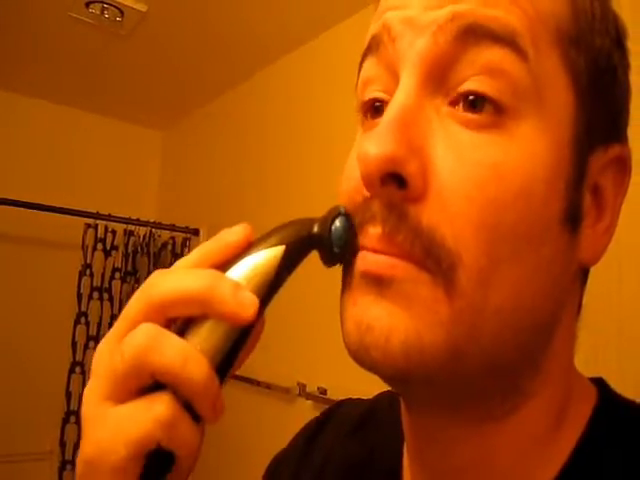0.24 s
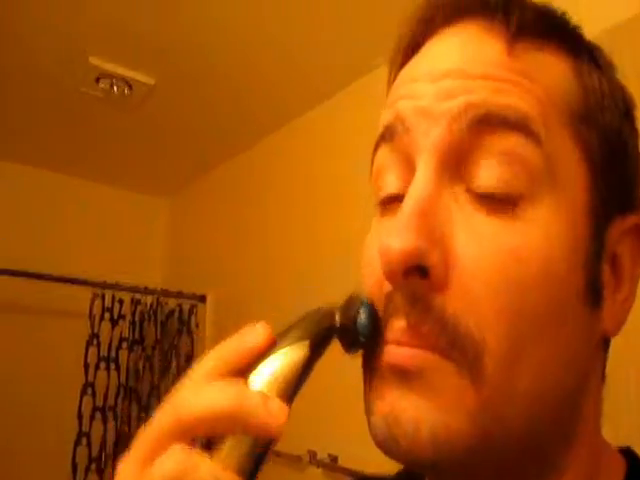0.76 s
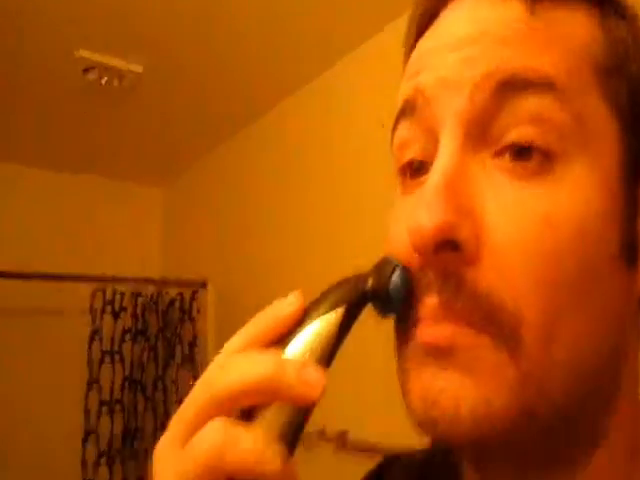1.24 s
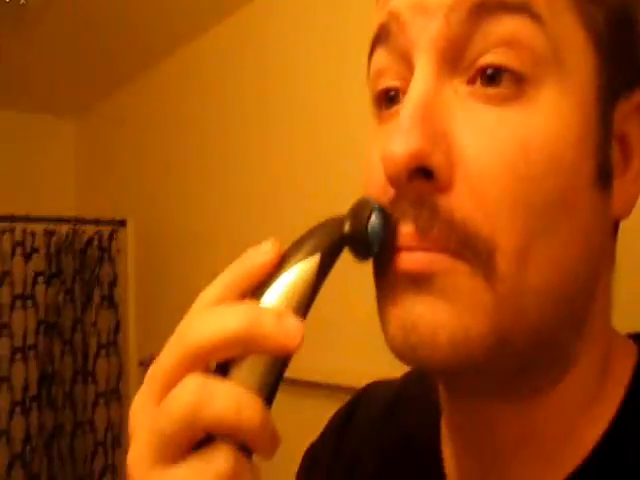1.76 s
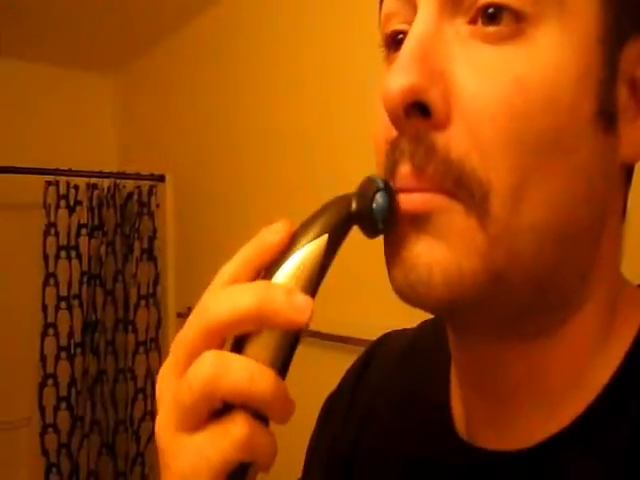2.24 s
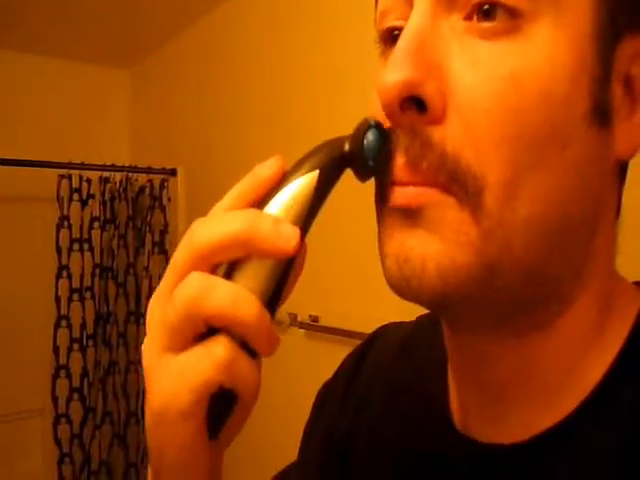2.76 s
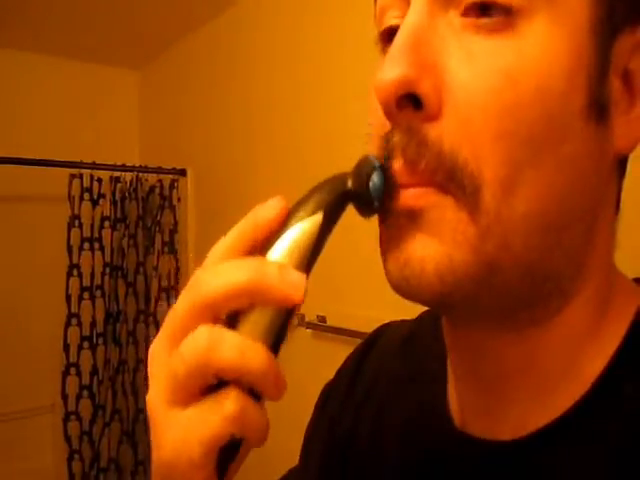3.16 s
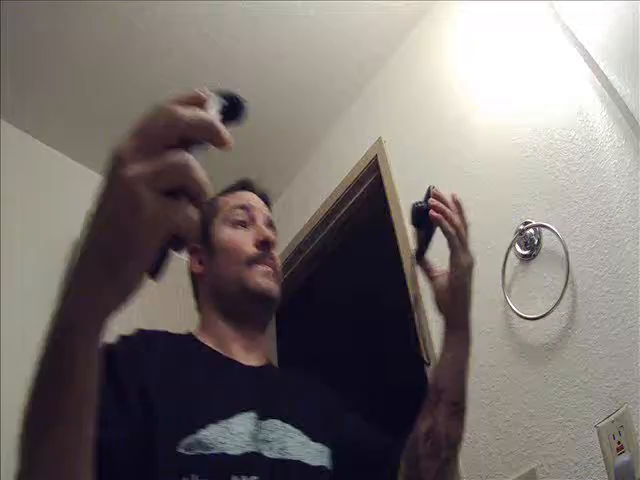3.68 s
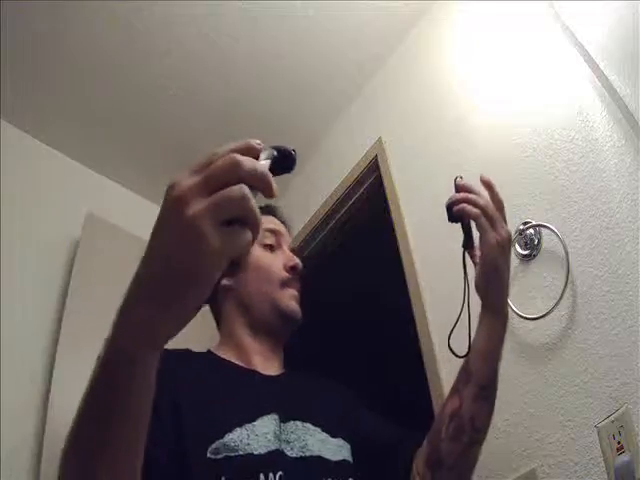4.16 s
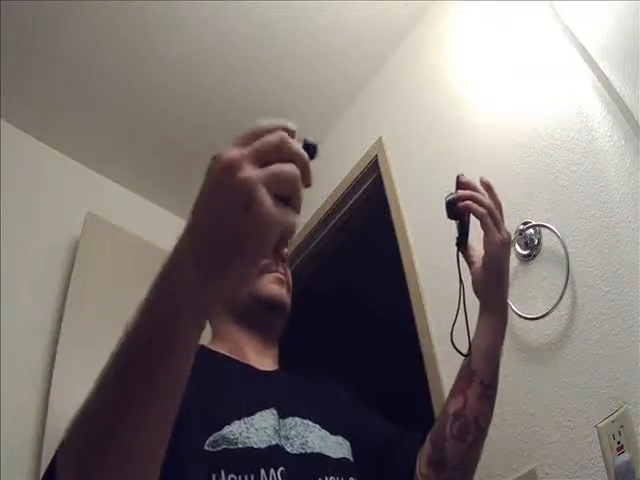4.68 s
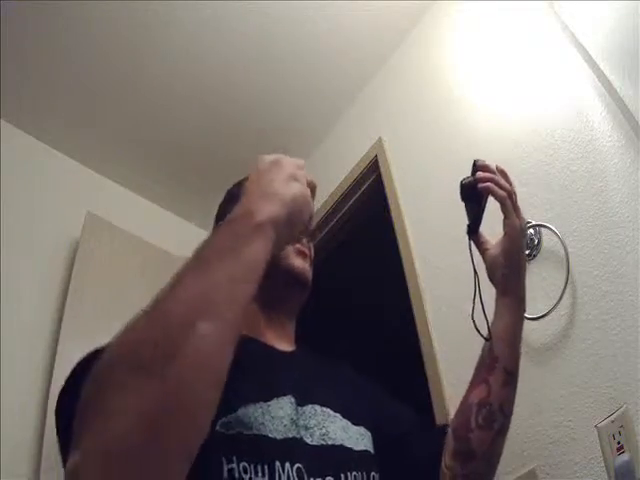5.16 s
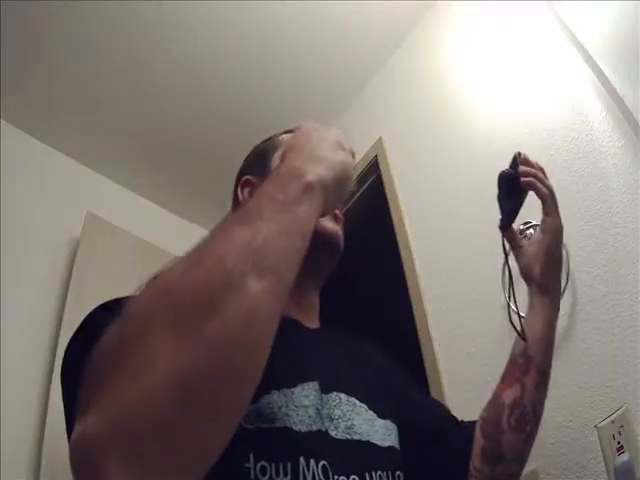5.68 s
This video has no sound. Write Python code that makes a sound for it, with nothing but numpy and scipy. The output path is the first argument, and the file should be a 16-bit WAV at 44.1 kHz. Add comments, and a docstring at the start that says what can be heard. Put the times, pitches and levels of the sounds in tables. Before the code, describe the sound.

Close, crackling electric shaver grinds over facial hair in a small room; near four seconds it suddenly drops to a faint, free-running buzz.

```python
"""A shaver whines and clatters close by while stubble snips and snags against its ringing head.
Room rumble and a droning extractor fan lie underneath. Near four seconds the close sound cuts to a far quieter,
duller microphone that hears the motor running free, with hiss, a low hum and two soft rustles.
Motor tones and rattle follow a slightly trembling shaft angle; noise clicks excite resonances for the hairs;
filtered noise makes the air sounds."""
import sys
import numpy as np
from scipy import signal
from scipy.fft import rfft, irfft
from scipy.io import wavfile
from scipy.ndimage import uniform_filter1d, map_coordinates

SR = 44100
rng = np.random.default_rng(int(sys.argv[2]) if len(sys.argv) > 2 else 0)


def waveform_to_disk(signal):
    """Save audio, clipped to [-1, 1], as 16-bit WAV at the path in sys.argv[1]."""
    frames = np.transpose(np.atleast_2d(signal))
    scaled = np.clip(frames, -1, 1) * 32767
    samples = np.round(scaled).astype(np.int16)
    wavfile.write(sys.argv[1], SR, samples)


N = 261072
T = np.arange(N) / SR  # time [s]

# Close levels stand ahead of the close fader; all levels stand ahead of the final rounding and top cut.
# Shaft speed up close, before its tremble: (time [s], shaft rate [Hz])
NEAR_SPEED = [(0.1, 105.8), (0.16, 111.2), (0.6, 110.8), (0.72, 107.3), (1.4, 107.2), (2.4, 106.3),
              (2.65, 105.2), (3.0, 106.2), (3.2, 105.6), (3.58, 106.6), (3.7, 104.9), (3.8, 106.0)]
# Motor whine: (multiple of shaft rate, relative level [dB])
NEAR_ORDERS = [(1, -13.5), (2, -20), (8, -3), (9, -4.5), (10, -7.5), (11, -4.5), (12, -3), (13, -6),
               (15, -1.5), (21, -5)]
NEAR_WHINE_DB, NEAR_CLATTER_DB = -44, -28.5
# Wandering motor drone: (time [s], pitch [Hz], rms level [dB])
DRONE = [(0.0, 729.9, -46.5), (0.17, 780.9, -38), (0.42, 764.4, -37.5), (0.49, 743.3, -44),
         (0.51, 786.3, -43), (0.61, 765.6, -37.5), (0.63, 751.9, -56), (0.67, 743.2, -39.5),
         (0.78, 741.1, -46), (0.9, 751.1, -38), (0.96, 746.0, -51), (0.99, 747.4, -42.5),
         (2.45, 745.6, -43.5), (2.59, 737.9, -36.5), (2.62, 738.7, -44.5), (2.88, 737.1, -37),
         (3.04, 774.7, -45), (3.15, 741.6, -45), (3.77, 742.7, -38.5), (3.8, 786.5, -45)]
# Two low motor hums: (time [s], third multiple rms level [dB], fifth multiple rms level [dB])
HUM = [(0.02, -52, -65), (0.12, -50.5, -59), (0.16, -58, -65), (0.3, -59.5, -47), (0.46, -71, -55),
       (0.59, -60, -50), (0.8, -56, -65.5), (0.92, -62, -41), (1.03, -57, -72), (1.13, -54, -65.5),
       (1.19, -50, -39), (1.35, -56, -61), (1.6, -56.5, -63.5), (1.78, -63, -77), (1.95, -63, -61.5),
       (2.2, -55, -53), (2.5, -60.5, -78), (2.56, -53, -44.5), (2.64, -57, -77), (2.71, -58.5, -45.5),
       (2.81, -46.5, -44.5), (2.9, -48.5, -56.5), (3.0, -53.5, -48), (3.15, -52, -77), (3.34, -58.5, -65),
       (3.61, -63.5, -69.5), (3.72, -49.5, -45), (3.789, -52.5, -57)]
HUM_ORDERS = 3, 5  # multiples of shaft rate
# Motor tones that swell briefly:
# (time [s], multiple of shaft rate, half length to 1/e [s], rms level at the crest [dB])
NEAR_SWELLS = [(0.13, 8, 0.09, -35.5), (0.22, 6, 0.085, -30.5), (0.22, 10, 0.036, -40),
               (0.22, 14, 0.1, -34.5), (0.33, 13, 0.05, -36), (0.36, 16, 0.09, -43), (0.39, 14, 0.06, -36),
               (0.41, 6, 0.035, -35.5), (0.53, 6, 0.013, -34), (0.57, 13, 0.054, -34.5),
               (0.59, 6, 0.014, -33), (0.92, 6, 0.09, -36), (0.94, 9, 0.07, -37.5), (1.21, 15, 0.05, -36),
               (1.22, 6, 0.05, -35), (1.38, 6, 0.052, -39.5), (2.0, 6, 0.05, -41), (2.54, 10, 0.045, -37),
               (2.68, 15, 0.08, -40.5), (2.72, 14, 0.06, -39), (2.81, 10, 0.025, -37),
               (2.95, 13, 0.07, -38.5), (3.24, 8, 0.035, -41), (3.5, 9, 0.12, -43), (3.52, 13, 0.1, -43)]
# Housing as the gears drive it: (frequency [Hz], filter gain [dB])
HOUSING = [(290, -61.5), (500, -31.5), (620, -5), (737, -3.5), (815, -13), (982, -5.5), (1040, -11),
           (1580, -8.5), (1720, -10), (2070, -7), (4640, -4), (10800, -11.5), (15500, -36)]

# How much stubble is under the blades: (time [s], snip level [dB])
STUBBLE = [(0.0, -27), (0.1, -21.5), (0.32, -21), (0.48, -23.5), (0.62, -23), (0.8, -27.5), (0.89, -23.5),
           (0.98, -24.5), (1.05, -24), (1.28, -25), (1.42, -21.5), (1.55, -28), (1.68, -23.5), (1.9, -27.5),
           (2.0, -22.5), (2.1, -26), (2.24, -25), (2.42, -31), (2.56, -22.5), (2.64, -29), (2.72, -21),
           (3.04, -24), (3.16, -29.5), (3.28, -24.5), (3.4, -26), (3.5, -34), (3.622, -35), (3.634, -21.5),
           (3.76, -22), (3.84, -29.5)]
IDLE_DB, LOADED_DB = -30, -25  # snip levels at which the gears run free and fully loaded
# Rings of the head, relative to the snips:
# (time [s], cheek level [dB], cup level [dB], rim level [dB], cap level [dB])
CONTACT = [(0.0, -9.5, -8.5, -16.5, -18.5), (0.2, -8.5, -6.5, -11.5, -16), (0.4, -5, -6.5, -10, -15.5),
           (0.6, -5.5, -5, -11, -15), (0.8, -9.5, -9.5, -16, -8), (0.95, -11, -11, -15.5, -8.5),
           (1.15, -8, -8.5, -15, -7), (1.3, -5.5, -9.5, -13.5, -10), (1.5, -11, -9, -12.5, -13.5),
           (1.6, -9.5, -8.5, -19, -9), (1.9, -9.5, -9.5, -16, -11.5), (2.35, -11.5, -10, -13.5, -24.5),
           (2.7, -6.5, -8.5, -11, -13.5), (3.1, -9.5, -7, -11, -11), (3.5, -10, -8.5, -19.5, -13.5),
           (3.62, -10, -13, -8.5, -10), (3.635, -11, -6.5, -7.5, -10), (3.8, -5, -5.5, -8.5, -8)]
# Resonances rung by the hairs, each table: (frequency [Hz], width [Hz], relative level [dB])
CHEEK = [(621, 270, -2.5), (1090, 530, -2), (1516, 220, 1.5), (2020, 190, -3.5)]
CUP = [(2338, 170, 1), (2730, 270, 2), (3033, 170, 3.5)]
RIM = [(3220, 200, 1), (3437, 390, -1)]
CAP = [(4605, 180, 0.5), (4890, 170, -2.5)]
COMB = [(4055, 120, 2), (4220, 740, -4), (4828, 420, 0), (5950, 870, -7), (6350, 230, -4.5),
        (7840, 1300, -4)]
# Hiss of the blade edges: (frequency [Hz], filter gain [dB])
EDGE_HISS = [(4710, -32), (8000, 8), (12800, -8), (14800, -22.5), (15500, -26)]
COMB_DB, EDGE_HISS_DB, TICK_DB = -1.5, -11.5, -13  # relative to the snips
# Colour of lone dry snaps: (frequency [Hz], filter gain [dB])
TICK_COLOUR = [(500, -30), (1200, -4), (3000, 0), (6000, -2), (10000, -12), (15500, -30)]
TICKS_PER_S, TICK_SCATTER_DB = 260, 2.5
# Ring of the blades: (time [s], centre frequency [Hz], level [dB])
BLADE = [(0.0, 6280, -38), (0.06, 6260, -35), (0.3, 6200, -35), (0.75, 6250, -38.5), (0.92, 6250, -36.5),
         (1.09, 6340, -35), (1.25, 6300, -41), (1.4, 6250, -35.5), (1.58, 6280, -43), (1.7, 6320, -37),
         (2.2, 6350, -40), (2.6, 6270, -43), (2.72, 6280, -41), (3.37, 6320, -42), (3.61, 6300, -46),
         (3.64, 6500, -33.5), (3.8, 6600, -37.5)]
BLADE_WIDTH_HZ = 200
# Thick hairs that snag: (time [s], level before attack and decay [dB], ring frequency [Hz])
SNAGS = [(0.5978, -24.5, 1390), (0.922, -20, 4580), (1.024, -19, 4600), (1.0618, -16, 3270),
         (1.099, -29, 4690), (1.117, -16.5, 4730), (1.165, -11, 4770), (1.214, -17.5, 4660),
         (1.304, -19, 4830), (1.414, -27, 4070), (1.4381, -13, 4730), (1.465, -19, 4570),
         (1.719, -20, 4800), (1.783, -13.5, 3150), (1.784, -13, 1474), (1.853, -19, 6260),
         (1.929, -26, 4570), (2.285, -24, 3860), (2.416, -17.5, 4360), (2.449, -23, 5970),
         (2.53, -22, 2600), (2.5615, -26, 3320), (2.592, -18.5, 4330), (2.7254, -20, 3500),
         (2.979, -17, 3420), (3.638, -26.5, 3330), (3.665, -18, 3230), (3.752, -18, 3300)]
SNAG_ATTACK_S, SNAG_DECAY_S = 0.002, 0.0045
SNAG_RASP = 0.39  # rasp gain beside the note

# Reflections off mirror and walls: (delay [ms], level [dB])
NEAR_ECHOES = [(3.7, -13), (6.3, -16), (9.1, -21), (13.7, -20.5), (19.3, -21.5)]
# Room rumble: (frequency [Hz], filter gain [dB])
ROOM = [(12, -38.5), (25, -4.5), (55, -5), (68, 4.5), (85, -10), (115, -2.5), (180, -12), (250, -13.5),
        (300, -10), (420, -13.5), (600, -34), (1000, -93.5)]
ROOM_DB, FAN_DB = -51, -62.5
# Extractor fan in the ceiling: (frequency [Hz], width [Hz], relative level [dB])
FAN = [(71, 5.3, 1.5), (120, 16, -1.5)]
# Close fader, cut to a faint rest and then away: (time [s], gain [dB])
NEAR_GAIN = [(3.8035, 1), (3.8045, -17.5), (3.834, -34), (3.843, -50), (3.927, -53.5), (3.929, -59),
             (3.955, -59.5), (3.97, -82)]

FAR_IN_S = (3.952, 3.972)  # start and end of the second microphone's fade-in
# Free-running shaft, before its tremble: (time [s], shaft rate [Hz])
FAR_SPEED = [(3.98, 107.4), (4.4, 107.3), (4.64, 107), (5.4, 107.1), (5.8, 106.8), (5.92, 106.2)]
# Free-running gears: (time [s], level before the top lift [dB], lift of the top [dB])
FAR_LEVEL = [(3.98, -66.5, 3), (4.2, -65.5, 5), (4.6, -67, 3.5), (5.58, -67.5, 3.5), (5.63, -66.5, 6),
             (5.92, -66.5, 5.5)]
# Gear rattle through the second microphone: (frequency [Hz], filter gain [dB])
FAR_COLOUR = [(88, -83), (150, -55), (315, -21.5), (562, -8), (949, -7), (1040, -4), (1360, -1),
              (1720, -10), (2220, -1), (3020, -6), (3430, 0.5), (4180, -2.5), (5190, 1.5), (7870, 0),
              (11300, -9.5), (14700, -42), (22000, -120)]
# Reflections off counter, mirror and walls: (delay [ms], level [dB])
FAR_ECHOES = [(2.9, -8), (4.7, -11), (7.9, -4), (12.1, -4), (17.3, -7)]
# Free-running whine: (multiple of shaft rate, relative level [dB])
FAR_ORDERS = [(1, -41), (2, -31), (3, -23), (4, -25), (5, -19), (6, -29), (7, -29), (8, -2), (9, -3),
              (10, -14), (11, -2), (12, 1), (14, -3), (16, -18), (17, 0.5), (18, -1), (20, -7.5), (22, -17),
              (23, -2), (24, -5), (25, -2), (26, -3), (27, -14)]
# Strongest tones trading places as the hand turns: (time [s], then one rms level [dB] per multiple below)
FAR_TONES = [(3.99, -82, -88, -92, -94), (4.2, -81, -82, -94, -77), (4.5, -78, -79, -92, -78),
             (4.65, -77, -82, -85, -89), (4.9, -78, -82, -80, -85), (5.1, -80, -83, -81, -79),
             (5.3, -78, -84, -94, -90), (5.52, -87.5, -77, -87, -83), (5.8, -91.5, -77.5, -80, -84.5),
             (5.9, -93.5, -80, -74, -92)]
FAR_TONE_ORDERS = 13, 15, 19, 21  # multiples of shaft rate
# Far swelling tones: (time [s], multiple of shaft rate, half length to 1/e [s], rms level at the crest [dB])
FAR_SWELLS = [(4.05, 63, 0.04, -79), (4.16, 49, 0.07, -75.5), (4.18, 54, 0.15, -80.5), (4.19, 58, 0.1, -79),
              (4.22, 33, 0.14, -78), (4.27, 60, 0.08, -76.5), (4.32, 48, 0.08, -76), (4.37, 51, 0.06, -78),
              (4.45, 23, 0.15, -81), (4.56, 59, 0.15, -81), (4.6, 57, 0.083, -75), (4.66, 47, 0.15, -80),
              (4.8, 52, 0.15, -77), (4.82, 53, 0.09, -79), (4.87, 43, 0.13, -80), (5.0, 50, 0.04, -77),
              (5.44, 49, 0.09, -77), (5.75, 49, 0.05, -79)]
# Hiss and low hum of the second microphone, each table: (frequency [Hz], filter gain [dB])
FAR_HISS = [(88, -80), (150, -42), (420, -3.5), (949, -1.5), (1040, -10), (1390, 2.5), (3020, -12),
            (7870, -17), (11300, -19), (14700, -45), (22000, -120)]
FAR_HUM = [(10, 2), (25, -6), (60, -15), (90, -24), (150, -52)]
FAR_HISS_DB, FAR_HUM_DB = -78, -86
# Soft rustles: (time [s], half length to 1/e [s], level at the crest [dB])
RUSTLES = [(4.232, 0.039, -70), (5.87, 0.037, -77.5)]

FAR_TOP_HZ, TOP_HZ = 11250, 15200  # top cuts of the second microphone and of the whole mix
SQUASH = .8  # drive into the peak rounding


def undb(db):
    """Decibels to gain."""
    return 10 ** (np.asarray(db) / 20)


def level(x, db=0):
    """Scale to an rms level."""
    return x * undb(db) / np.sqrt(np.mean(x ** 2))


def curves(table):
    """Draw each column of a table as a line against time."""
    s, *columns = np.transpose(table)
    return [np.interp(T, s, c) for c in columns]


def filtered(x, kind, order, hz):
    """Butterworth filter."""
    return signal.sosfilt(signal.butter(order, hz, kind, fs=SR, output="sos"), x)


def resonate(x, hz, q):
    """A single resonance."""
    b, a = signal.iirpeak(hz, q, SR)
    return signal.lfilter(b, a, x)


def sine(cycles):
    """Tone from a running count of cycles."""
    return np.sin(2 * np.pi * cycles)


def bump(s, half):
    """Smooth rise and fall around a moment."""
    return np.exp(-((T - s) / half) ** 2)


def walk(rate):
    """Random levels held 1 / rate s and slewed twice; spread near 1."""
    k = int(SR / rate)
    steps = np.repeat(rng.standard_normal(N // k + 1), k)
    return 1.3 * uniform_filter1d(uniform_filter1d(steps, k), k)[:N]


def colour(x, points):
    """Filter through a spectrum of (frequency [Hz], gain [dB]) points; rms 1."""
    hz, db = np.transpose(points)
    f = np.maximum(np.arange(N // 2 + 1) * SR / N, 1)
    gain = undb(np.interp(np.log(f), np.log(hz), db))
    return level(irfft(rfft(x) * gain, N))


def ring(x, modes, flicker_db=0, flicker_per_s=38):
    """Parallel resonances of alternating sign, each flickering alone as contact shifts; rms 1."""
    out = 0
    for k, (hz, width, db) in enumerate(modes):
        gain = undb(db + flicker_db * walk(flicker_per_s))
        out = out + (-1) ** k * gain * resonate(x, hz, hz / width)
    return level(out)


def echoes(x, taps, drift_ms):
    """Reflections whose paths shift as the hand moves, so notches wander; power kept."""
    out, samples = x, np.arange(N)
    for ms, db in taps:
        delay = (ms + drift_ms * walk(3)) * SR / 1000
        out = out + undb(db) * map_coordinates(x, [samples - delay], order=3)
    return out / np.sqrt(1 + sum(undb(2 * db) for _, db in taps))


def turns(hz, wobble):
    """Shaft angle in turns; the speed trembles slightly at random."""
    return np.cumsum(hz * (1 + wobble * walk(25))) / SR


def whine(angle, orders, wander_db):
    """Tones on multiples of the shaft rate, each wavering as the hand moves; rms 1."""
    return level(sum(undb(db + wander_db * walk(3.7)) * sine(k * angle + rng.random()) for k, db in orders))


def swells(table, angle):
    """Single multiples of the shaft rate that rise and fade."""
    return sum(undb(db) * bump(s, half) * sine(round(k) * angle) for s, k, half, db in table)


def tones(angle):
    """A wandering drone, two low hums and brief swells, all from the motor."""
    out = swells(NEAR_SWELLS, angle)
    for k, db in zip(HUM_ORDERS, curves(HUM)):
        out = out + undb(db + 1.0 * walk(16)) * sine(k * angle)
    hz, db = curves(DRONE)
    drone = undb(db) * sine(np.cumsum(hz) / SR)
    return np.sqrt(2) * (out + drone)  # sine peak from rms


def clatter(angle, memory, size=512):
    """Gear rattle that nearly repeats: every turn keeps a share of the one before; rms 1."""
    keep = np.clip(memory, 0, .99)
    pattern = signal.lfilter([1], [1, -keep], rng.standard_normal((800, size)), axis=0)[60:]
    return level(map_coordinates(pattern.ravel(), [angle * size], order=3))


def near_gears(angle):
    """Gears repeat closely when running free; stubble scrambles the pattern, and the housing colours it."""
    load = np.interp(curves(STUBBLE)[0], (IDLE_DB, LOADED_DB), (0, np.pi / 2))
    free = np.cos(load) * clatter(angle, memory=.72)
    loaded = np.sin(load) * clatter(angle, memory=.4)
    return undb(NEAR_CLATTER_DB) * colour(free + loaded, HOUSING)


def snips(angle, per_s, scatter_db, throb_once, throb_twice):
    """Dense clicks of cut hairs whose strength throbs once and twice a turn."""
    chance = rng.random((2, N))
    sizes = undb(-scatter_db * np.log(chance[1])) * rng.standard_normal(N)
    stroke = 1 + throb_once * np.cos(2 * np.pi * angle) + throb_twice * np.cos(4 * np.pi * angle + 1)
    return (chance[0] < per_s / SR) * sizes * stroke


def ticks():
    """Lone dry snaps of stiffer hairs, too short to ring; rms 1."""
    chance = rng.random((2, N))
    struck = (chance[0] < TICKS_PER_S / SR).astype(float)
    sizes = undb(-TICK_SCATTER_DB * np.log(chance[1]))
    return colour(-struck * sizes, TICK_COLOUR)


def blades(hairs):
    """A narrow ring of the blades whose centre drifts in pitch."""
    hz, db = curves(BLADE)
    carrier = np.exp(2j * np.pi * np.cumsum(hz) / SR)
    # shift the moving centre to zero, keep a narrow band, then shift it back
    band = filtered(hairs / carrier, "low", 2, BLADE_WIDTH_HZ / 2)
    return undb(db + 1.2 * walk(30)) * level((band * carrier).real)


def cutting(angle):
    """Stubble, partly repeating each turn, rings cheek, cup, rim, comb, cap, blades and their edges."""
    cheek_db, cup_db, rim_db, cap_db = curves(CONTACT)
    clicks = level(snips(angle, per_s=8000, scatter_db=1.0, throb_once=.14, throb_twice=.25))
    hairs = clicks + .3 * clatter(angle, memory=.5)
    cheek = undb(cheek_db) * ring(hairs, CHEEK, flicker_db=1.3)
    cup = undb(cup_db) * ring(hairs, CUP, flicker_db=1.2)
    rim = undb(rim_db) * ring(hairs, RIM, flicker_db=1.5)
    cap = undb(cap_db) * ring(hairs, CAP, flicker_db=3.2, flicker_per_s=50)
    comb = undb(COMB_DB) * ring(hairs, COMB, flicker_db=1.8, flicker_per_s=28)
    hiss = undb(EDGE_HISS_DB + 1.6 * walk(22)) * colour(hairs, EDGE_HISS)
    snaps = undb(TICK_DB) * ticks()
    pressure_db = 0.7 * walk(36)
    stubble = undb(curves(STUBBLE)[0] + pressure_db)
    return stubble * (comb + cheek + cup + rim + cap + hiss + snaps) + blades(hairs)


def room_rumble():
    """Filtered noise: a wavering low rumble under an upper rumble that comes in patches."""
    air = colour(rng.standard_normal(N), ROOM)
    upper = filtered(air, "high", 2, 150)
    top = filtered(upper, "high", 4, 340)
    low = undb(2.4 * walk(12)) * (air - upper)
    patches = undb(5.0 * walk(11) - 3.0) * (upper - top) + undb(5.5 * walk(12) - 3.5) * top
    return undb(ROOM_DB) * (low + patches)


def extractor_fan():
    """Noise through two narrow low resonances drones in the ceiling."""
    return undb(FAN_DB + 1.5 * walk(6.8)) * ring(rng.standard_normal(N), FAN)


def snags():
    """Short rings as a thick hair is caught and sheared: a narrow note over a broad rasp."""
    out = np.zeros(N)
    t = np.arange(int(0.027 * SR)) / SR
    shape = np.minimum(t / SNAG_ATTACK_S, 1) * np.exp(-t / SNAG_DECAY_S)
    for s, db, hz in SNAGS:
        rub = rng.standard_normal(len(t))
        note = level(resonate(rub, hz, q=18))
        rasp = level(resonate(rub, hz, q=0.7))
        i = int(s * SR)
        out[i:i + len(t)] += undb(db) * (note + SNAG_RASP * rasp) * shape
    return out


def near():
    """Shaver on the cheek over the rumble of the room and the fan."""
    angle = turns(curves(NEAR_SPEED)[0], wobble=.003)
    motor = tones(angle) + undb(NEAR_WHINE_DB) * whine(angle, NEAR_ORDERS, wander_db=1.5)
    head = echoes(near_gears(angle) + cutting(angle) + snags(), NEAR_ECHOES, drift_ms=.12)
    head = filtered(head, "high", 8, 575)  # too small to radiate bass
    return motor + head + room_rumble() + extractor_fan()


def far_motor():
    """Free-running motor: echoing gear rattle, whine, four shifting tones and brief swells."""
    db, top_db = curves(FAR_LEVEL)
    angle = turns(curves(FAR_SPEED)[0], wobble=0.0013)
    gears = echoes(colour(clatter(angle, memory=.5), FAR_COLOUR), FAR_ECHOES, drift_ms=.09)
    # turning the head toward the microphone brightens it
    gears = gears + (undb(top_db) - 1) * filtered(gears, "high", 2, 7000)
    motor = undb(db) * (gears + undb(-9) * whine(angle, FAR_ORDERS, wander_db=4.5))
    for k, tone_db in zip(FAR_TONE_ORDERS, curves(FAR_TONES)):
        motor = motor + np.sqrt(2) * undb(tone_db + 1.7 * walk(12)) * sine(k * angle)
    return motor + np.sqrt(2) * swells(FAR_SWELLS, angle)


def far_hiss():
    """Steady coloured noise."""
    return undb(FAR_HISS_DB) * colour(rng.standard_normal(N), FAR_HISS)


def far_hum():
    """Low noise that wavers in level."""
    return undb(FAR_HUM_DB + 3.0 * walk(8)) * colour(rng.standard_normal(N), FAR_HUM)


def rustles():
    """Soft puffs of noise through broad resonances."""
    puffs = sum(undb(db) * bump(s, half) for s, half, db in RUSTLES)
    # (frequency [Hz], width [Hz], relative level [dB])
    return puffs * ring(rng.standard_normal(N), [(892, 400, -2), (1500, 660, 0), (2250, 600, -5)])


def far():
    """Everything at the second microphone, its top cut steeply."""
    heard = far_motor() + far_hiss() + far_hum() + rustles()
    return signal.sosfilt(signal.ellip(8, .2, 75, FAR_TOP_HZ, fs=SR, output="sos"), heard)


def scene():
    """The close sound, then the cut to the second microphone."""
    close = near() * undb(curves(NEAR_GAIN)[0])
    distant = far() * np.interp(T, FAR_IN_S, (0, 1))
    return (close + distant)[None]


def record(dry):
    """The camera rounds the loudest peaks and cuts the top."""
    rounded = np.tanh(SQUASH * dry) / SQUASH
    return signal.sosfilt(signal.ellip(10, .2, 80, TOP_HZ, fs=SR, output="sos"), rounded)


dry = scene()
out = record(dry)
waveform_to_disk(out)
```